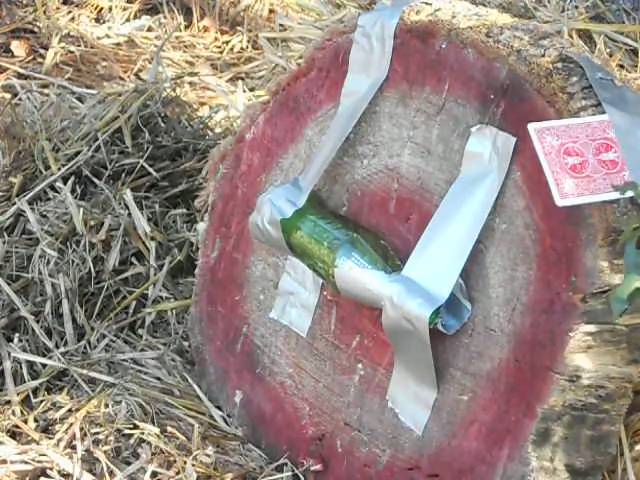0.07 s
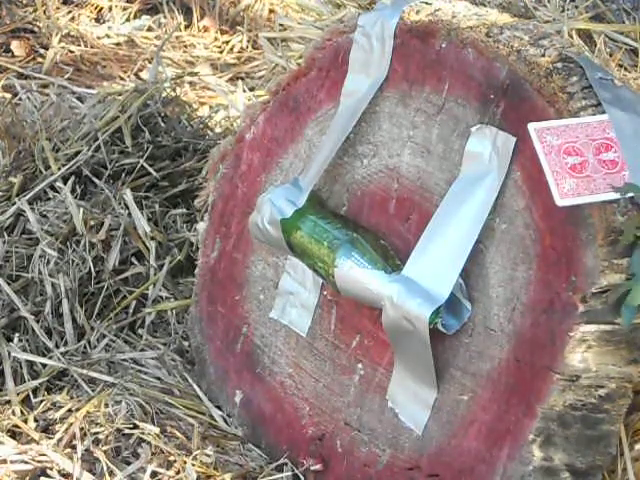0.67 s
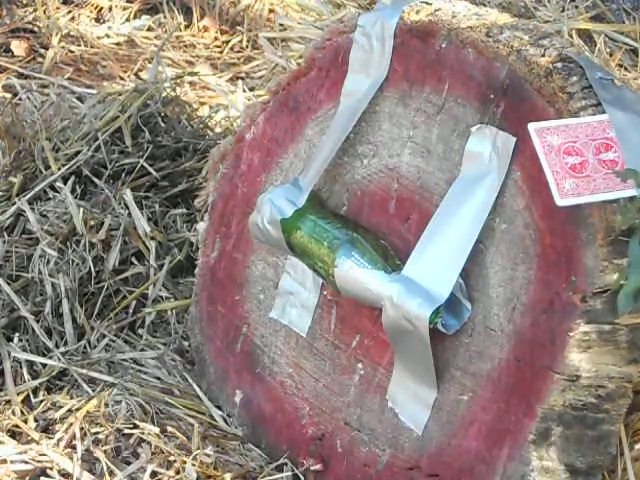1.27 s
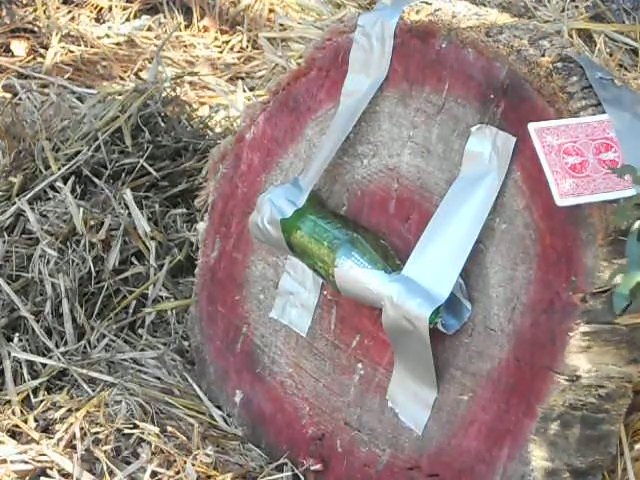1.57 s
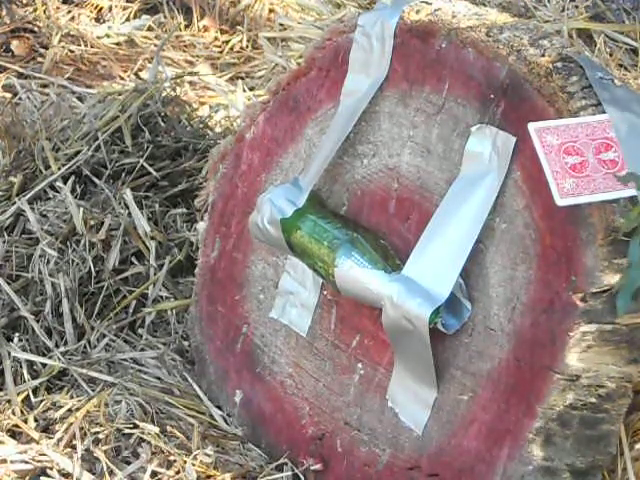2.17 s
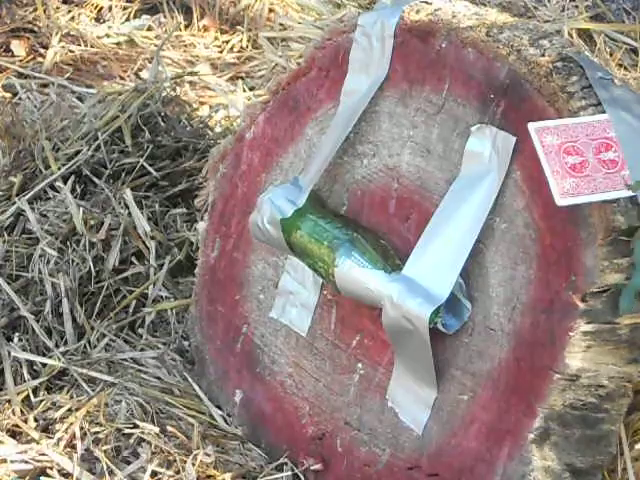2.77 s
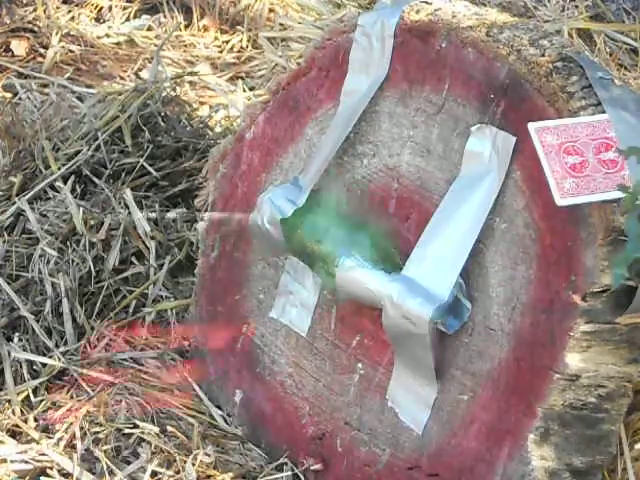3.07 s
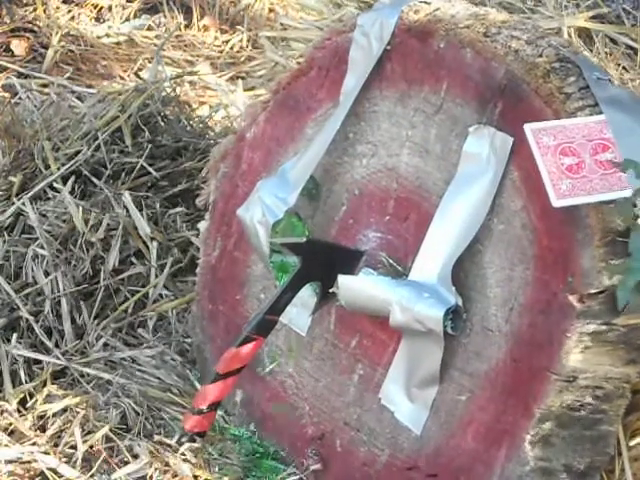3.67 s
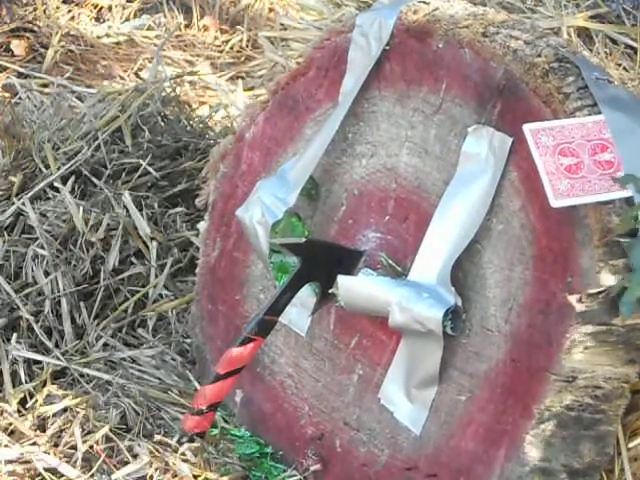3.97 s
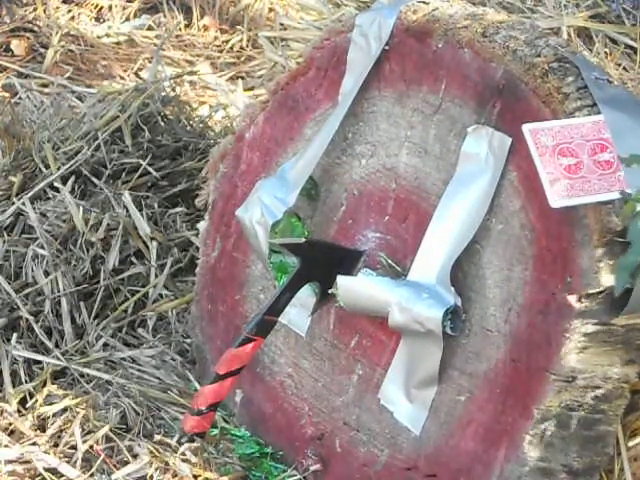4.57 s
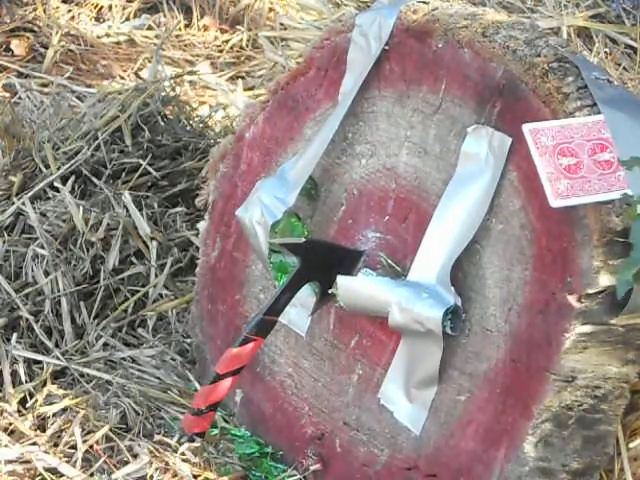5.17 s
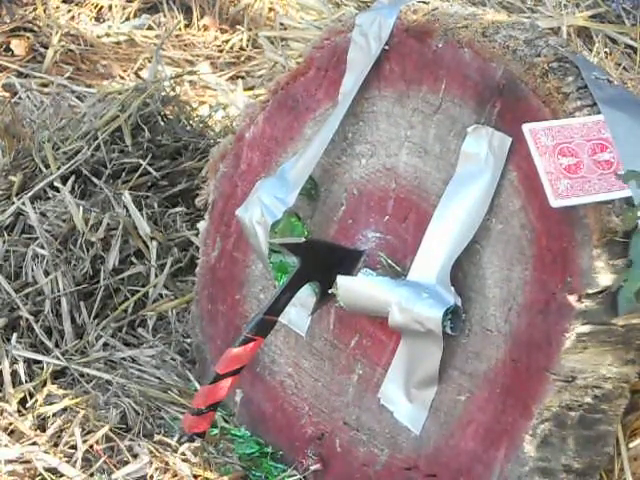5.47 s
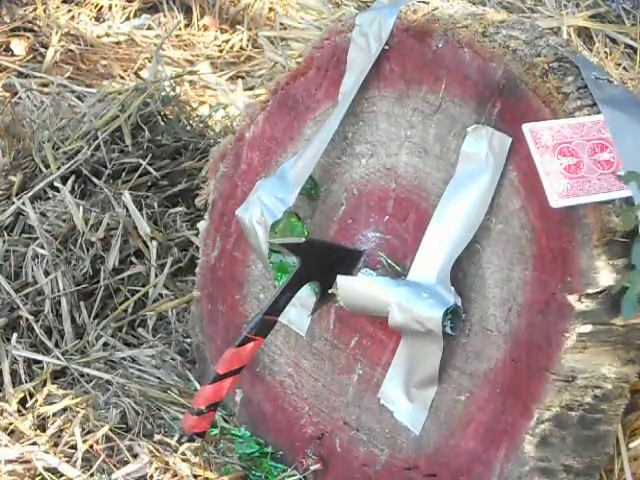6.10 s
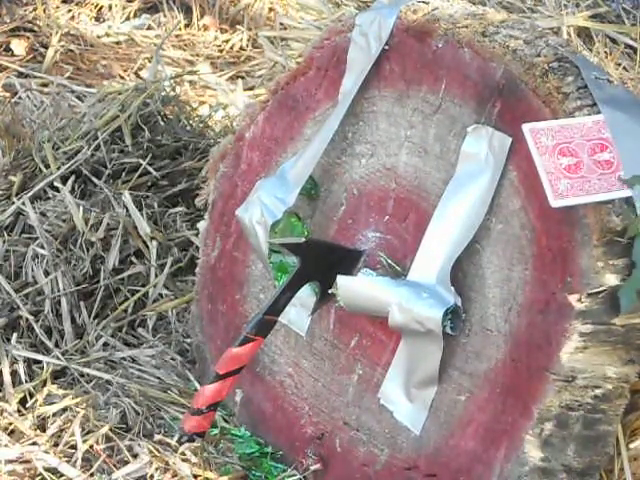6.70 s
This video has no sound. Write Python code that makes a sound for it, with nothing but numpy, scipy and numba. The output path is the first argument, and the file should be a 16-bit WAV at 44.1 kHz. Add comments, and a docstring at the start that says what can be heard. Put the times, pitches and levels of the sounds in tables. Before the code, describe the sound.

A thrown axe swishes in and smashes a glass bottle against a wooden target, shards scattering over a distant traffic hum.

```python
"""Distant traffic hums outdoors; a bird chirps, then a thrown axe swishes in and smashes a glass bottle.
The bottle is taped to a log target, which thuds as the blade bites. For two seconds shards clink
together and drop into straw. The blow makes the nearby camcorder turn its own volume down;
the traffic and an idling engine swell back as it recovers."""
import sys
import numpy as np
from scipy import signal
from scipy.fft import rfft, irfft
from scipy.io import wavfile
from scipy.ndimage import uniform_filter1d, minimum_filter1d
from numba import njit

SR = 44100
rng = np.random.default_rng(int(sys.argv[2]) if len(sys.argv) > 2 else 0)


def store_wav(level_fs):
    """Save 16-bit WAV to argv[1]."""
    pcm = np.round(np.clip(np.atleast_2d(level_fs), -1, 1) * 32767)
    wavfile.write(sys.argv[1], SR, pcm.T.astype(np.int16))


N = 306054
TIME = np.arange(N) / SR
HIT_S = 3.0964


def undb(db):
    """Turn decibels into a factor to multiply by."""
    return 10 ** (np.asarray(db) / 20)


def unit(x):
    """Scale x to an average power of 1."""
    return x / np.sqrt(np.mean(x ** 2) + 1e-20)


def add(out, s, x):
    """Mix x into out, starting at s seconds."""
    i = int(s * SR)
    out[i:i + len(x)] += x[:N - i]


def colour(x, points):
    """Make each frequency louder or softer along a curve of (f/Hz, level/dB) points."""
    hz, db = np.transpose(points)
    f = np.fft.rfftfreq(len(x), 1 / SR)
    curve_db = np.interp(np.log(f + 1), np.log(hz), db)
    return irfft(rfft(x) * undb(curve_db), len(x))


def band(x, lo_hz, hi_hz, order=2):
    """Keep the sound between two frequencies."""
    return signal.sosfilt(signal.butter(order, [lo_hz, hi_hz], "band", fs=SR, output="sos"), x)


def walk(rate):
    """A smooth random wander of size about 1, changing about rate times a second."""
    k = int(SR / rate)
    steps = np.repeat(rng.standard_normal(N // k + 1), k)
    return unit(uniform_filter1d(uniform_filter1d(steps, k), k)[:N])


def tone(hz, waver, rate):
    """A tone whose pitch wanders by about the fraction waver."""
    pitch = hz * (1 + waver * walk(rate))
    return unit(np.sin(2 * np.pi * np.cumsum(pitch) / SR))


def fade(t60, size):
    """Die away by 60 dB every t60 seconds (the fade time)."""
    return np.exp(-np.log(1000) * TIME[:size] / t60)


def ring(notes, size=20000):
    """A struck object sounds all its natural notes at once, and each dies away."""
    return sum(undb(db) * fade(t60, size) * np.sin(2 * np.pi * hz * TIME[:size]) for hz, db, t60 in notes)


def traffic(level_db=-34.3, rise_db_per_s=.14, bass_rise_db_per_s=.15, swell_db=.2, flutter_db=1.2):
    """Distant traffic slowly draws nearer, its restless bass swelling most."""
    # traffic wash and open-air hiss: f/Hz, level/dB
    spectrum = [(12, -30), (20, -1.5), (63, -1), (87, -2), (113, -4.5), (147, -10.5), (186, -11),
                (397, -11.5), (529, -8), (826, -7.5), (1150, -11), (2360, -21), (5170, -26), (10500, -28.5)]
    air = unit(colour(rng.standard_normal(N), spectrum))
    bass = signal.sosfiltfilt(signal.butter(2, 350, fs=SR, output="sos"), air)
    bass_gain = undb(flutter_db * walk(9) + bass_rise_db_per_s * (TIME - TIME.mean()))
    gain = undb(level_db + rise_db_per_s * TIME + swell_db * walk(3))
    return (bass * bass_gain + air - bass) * gain


def engine(firing_hz=75.6, growl_db=-14):
    """A far engine idles and grows louder: its firing hums, with a growl and a drone above."""
    # engine loudness over time: t/s, hum level/dB, drone level/dB
    loudness = [(0, -53, -55), (1.6, -51, -54), (2.15, -44.5, -47), (4.6, -42, -49), (5.25, -38.5, -43.5),
                (5.8, -37, -47), (6.94, -35, -45)]
    s, *levels = np.transpose(loudness)
    hum_db, drone_db = (np.interp(TIME, s, db) for db in levels)
    hum = unit(tone(firing_hz, waver=.024, rate=14) * undb(2 * walk(10)))
    growl = undb(growl_db) * unit(band(rng.standard_normal(N), 310, 430))
    drone = unit(band(rng.standard_normal(N), 134, 144))
    return (hum + growl) * undb(hum_db) + drone * undb(drone_db)


def whine():
    """Two close, nearly steady tones come from inside the camcorder."""
    # the thin whine: f/Hz, level/dB
    tones = [(7852, -64), (7882, -62)]
    return sum(undb(db) * tone(hz, waver=.0005, rate=6) for hz, db in tones)


def bird(start_s=.999, length_s=.052, edge_s=.007, level_db=-43.5,
         low_hz=6750, low_after_s=.023, glide_hz_per_s=32000):
    """A small bird's chirp scoops down to its lowest pitch and rises again."""
    age = np.clip(TIME - start_s, 0, length_s)
    hz = low_hz + glide_hz_per_s * np.abs(age - low_after_s)
    fade_in_out = np.minimum(1, np.minimum(age, length_s - age) / edge_s)
    return tone(hz, waver=.02, rate=500) * undb(level_db) * fade_in_out


def swish():
    """The spinning blade tears the air in gusts that swell and fade."""
    # gusts as the axe nears the target: peak t/s, level/dB, half-length/s
    gusts = [(2.818, -42, .01), (3.03, -41, .028), (3.085, -41, .011)]
    swell = sum(undb(db) * np.exp(-.5 * ((TIME - s) / half) ** 2) for s, db, half in gusts)
    return unit(band(rng.standard_normal(N), 2000, 6800)) * swell


def tick(hz, t60, ring_db=-9, scuff_db=-23, ring_t60=.015, scuff_t60=.06, size=4000):
    """Glass snaps, rings and scuffs; a higher hz means a smaller, brighter piece."""
    # the sound a splinter gives off: f/Hz, level/dB
    spectrum = [(500, -34), (1500, -16), (2800, -14.5), (3700, -9.5), (4600, -0.5), (5300, 0), (6400, -4.5),
                (7500, -5), (9000, -3.5), (10500, -5), (13000, -12)]
    tilt = 16 * np.log2(hz / 6400)  # dB per octave
    tilted = [(f, db + tilt * np.log2(max(f, 3500) / 6400)) for f, db in spectrum]
    noise = unit(colour(rng.standard_normal(size), tilted))
    snap = noise * (fade(t60, size) + undb(scuff_db) * fade(scuff_t60, size))
    # each splinter bends at its own two pitches
    low, high = rng.uniform(4400, 5700), rng.uniform(7400, 9800)
    ringing = ring([(low, ring_db - tilt / 2, ring_t60), (high, ring_db + tilt / 2, ring_t60)], size)
    x = band(snap + ringing, 1200, 14000)
    return x / np.sqrt(np.mean(x[:SR // 200] ** 2))  # power 1 over the first 5 ms


def bottle_burst(ring_db=-1):
    """The bottle rings as cracks run through it; thin glass gives off only treble."""
    # the breaking bottle's notes: f/Hz, level/dB, fade time/s
    notes = [(3650, 2, .037), (4200, 19, 0.013), (4850, 33.5, .012), (5060, 21, .055), (5040, -10.5, 0.36),
             (7380, 25, 0.016), (8260, 20, .012), (9040, 9, .036)]
    # cracks in the glass: t/s, level/dB, brightness/Hz, fade time/s
    cracks = [(3.0976, 17.5, 6200, 0.012), (3.099, 16, 7000, 0.0051), (3.1, 19, 5400, .005)]
    glass = np.zeros(N)
    add(glass, HIT_S, undb(ring_db) * ring(notes))
    for s, db, hz, t60 in cracks:
        add(glass, s, undb(db) * tick(hz, t60, ring_db=-15.5, scuff_db=-29.5))
    return band(glass, 3200, 16000)


def log_thud(bite_delay_s=.0003, size=8000):
    """The blade sets the log ringing, and wood fibres crunch briefly under each knock."""
    # notes of the log and axe head: f/Hz, level/dB, fade time/s
    notes = [(347, 15, 0.034), (560, 17.5, .03), (852, 13, .05), (1124, 31.5, .013), (1130, -10.5, 0.48),
             (1390, 17.5, .012), (1880, 18.5, .014), (2300, 0.5, .07)]
    # dull knocks of handle, log and heavy pieces: t/s, level/dB, centre f/Hz, fade time/s
    knocks = [(3.097, 17, 850, .018), (3.1008, 21, 650, .009), (3.1014, 23, 648, .01),
              (3.1455, -4, 600, 0.045), (4.8673, -27, 1500, 0.014), (6.0632, -18, 570, 0.016)]
    wood = np.zeros(N)
    add(wood, HIT_S + bite_delay_s, ring(notes))
    for s, db, hz, t60 in knocks:
        crunch = unit(band(rng.standard_normal(size), hz / 2, hz * 2, order=3))
        add(wood, s, undb(db) * crunch * fade(t60, size))
    return band(wood, 305, 8000, order=5)  # a short, thick log gives off no bass


def spray(scatter_db=3, kinds=12):
    """Countless tiny grains of glass burst out, bounce off the log and trickle into straw."""
    # showers of fine glass: t/s, level/dB, fall/(dB per s), grains per second
    showers = [(3.098, -1, 450, 5500), (3.11, -14.5, 72, 3000), (3.4, -31, 30, 700), (3.78, -35, 18, 400)]
    hits, out = np.zeros(N), np.zeros(N)
    for s, db, fall, rate in showers:
        signs = rng.choice([-1, 1], N)
        strengths = unit(signs * undb(scatter_db * np.minimum(rng.exponential(size=N), 4)))
        lands = rng.random(N) < rate / SR
        add(hits, s, lands * strengths * np.sqrt(SR / rate) * undb(db - fall * TIME))
    kind = rng.integers(0, kinds, N)  # each hit plays one of a few ticks, dull to bright
    for k, hz in enumerate(np.geomspace(5000, 8000, kinds)):
        grain = tick(hz, .0024, ring_db=-18)
        out += signal.oaconvolve(hits * (kind == k), grain / np.linalg.norm(grain))[:N]
    return out


def uneven_times(start_s, length_s, per_s):
    """Random moments, one in each slot of 1 / per_s seconds."""
    slots = np.arange(256) + rng.random(256)
    return start_s + slots[slots < length_s * per_s] / per_s


def clinks(focus_db_per_octave=36, click_db=-18, jingle_db=-14.5, jingle_hz=9700):
    """Shards collide, click and ring, loudest near the pitch that each contact favours."""
    # a shard's notes: f/Hz, level/dB, fade time/s
    notes = [(5300, 0, 0.054), (5390, -5, 0.045), (5669, -12.5, .06), (7278, -0.5, 0.033),
             (9220, -6.5, .07), (9830, -1, .06)]
    # the loudest knocks between larger shards: t/s, level/dB, favoured f/Hz
    contacts = [(3.124, -6, 9800), (3.229, -9, 9100), (3.253, -12, 5270), (3.2585, -12.5, 7400),
                (3.263, -11, 5200), (3.294, -15, 5400), (3.3445, -14, 10400), (3.413, -9, 7300),
                (3.429, -16, 5360)]
    # small shards jingle together while still in the air
    jingle = [(s, jingle_db, jingle_hz) for s in uneven_times(HIT_S, length_s=.24, per_s=25)]
    out = np.zeros(N)
    for s, db, favoured in contacts + jingle:
        detune = 1 + .005 * rng.standard_normal(len(notes))  # no two pieces are the same size
        struck = [(hz * shift, note_db - focus_db_per_octave * abs(np.log2(hz / favoured)), t60)
                  for (hz, note_db, t60), shift in zip(notes, detune)]
        add(out, s, undb(db) * ring(struck))
        add(out, s, undb(db + click_db) * tick(favoured, .008))
    return out


def splinters():
    """The loudest splinters tick as they land on wood and straw."""
    # splinters landing: t/s, level/dB, brightness/Hz, fade time/s
    landings = [(3.1463, -5, 6000, .012), (3.2027, -12, 5000, .018), (3.4425, -23, 6200, .015),
                (3.4851, -25, 5800, .014), (3.4995, -22, 5800, .012), (3.6663, -27, 5900, .0054),
                (3.7555, -28, 6700, .005), (3.8486, -23, 4900, .024), (3.9092, -26, 5500, .006),
                (3.9218, -15, 7800, .012), (4.0629, -31, 5800, .005), (4.1121, -26, 6400, .016),
                (4.1762, -21, 6400, .016), (4.181, -27, 6400, .05), (4.234, -22, 5700, .0056),
                (4.2698, -30.5, 6000, .014), (4.3329, -21.5, 7000, .008), (4.34, -30, 5600, .006),
                (4.4889, -28.5, 8400, .0056), (4.5557, -35, 5400, .011), (4.574, -32, 7240, .0061),
                (4.8254, -35.5, 5100, .021), (4.868, -26, 6300, .018), (5.1503, -32, 6300, .022)]
    out = np.zeros(N)
    for s, db, hz, t60 in landings:
        add(out, s, undb(db) * tick(hz, t60))
    return out


def patter(per_s=26, scatter_db=2, centre_hz=6500, spread_octaves=.15):
    """Lesser splinters land at random, each with its own brightness and strength."""
    # two waves, pieces flung down and then those flung high: t/s, length/s, level/dB, fall/(dB per s)
    waves = [(3.16, .34, -21, 22), (3.76, .42, -27, 20)]
    out = np.zeros(N)
    for start, length, db, fall in waves:
        chance = rng.standard_normal((256, 2))
        for s, (strength, brightness) in zip(uneven_times(start, length, per_s), chance):
            gain = undb(db - fall * (s - start) + scatter_db * strength)
            add(out, s, gain * tick(centre_hz * 2 ** (spread_octaves * brightness), t60=.009))
    return out


def with_echo(x, echo_db, low_t60=.5, high_t60=.48, treble_db=-5, size=30000):
    """Sound bounces faintly back from the ground, straw and trees."""
    low = band(rng.standard_normal(size), 180, 1500) * fade(low_t60, size)
    high = band(rng.standard_normal(size), 1500, 10000) * fade(high_t60, size)
    tail = (low + undb(treble_db) * high) * (1 - fade(.034, size))
    return x + undb(echo_db) * signal.oaconvolve(x, tail / np.linalg.norm(tail))[:N]


@njit
def recover(wanted, step):
    """The volume drops at once to the wanted value and creeps back up."""
    gain, g = np.empty(len(wanted)), 1.
    for i in range(len(wanted)):
        g = min(wanted[i], g + (wanted[i] - g) * step)
        gain[i] = g
    return gain


def limiter(x, ceiling_db=-12, look_ahead_s=.0036, hold_s=.67, release_s=1.136):
    """The camcorder turns itself down just before a loud peak, waits, then slowly recovers."""
    loudness = np.sqrt(np.abs(uniform_filter1d(x ** 2, SR // 200)) + 1e-12)
    wanted = np.minimum(1, undb(ceiling_db) / loudness)
    half = int(hold_s * SR / 2)
    held = minimum_filter1d(wanted, 2 * half + 1, origin=half, mode="nearest")
    early = np.roll(held, -int(look_ahead_s * SR))
    return x * recover(early, 1 / (release_s * SR))


def scene():
    """The smash and its falling glass, over the sounds of the open air."""
    smash = bottle_burst() + log_thud() + splinters() + clinks() + patter() + spray()
    smash = with_echo(smash, echo_db=-33)
    chirp = with_echo(bird(), echo_db=-10, high_t60=.2)
    return (smash + swish() + chirp + traffic() + engine() + whine())[None]


def record(dry, rumble_db=-64, treble_limit_hz=12100, clip_at=.74, top_hz=16000):
    """The camcorder limits the blow, adds rumble, cuts the highest treble and clips the tallest peaks."""
    # the camcorder's own rumble: f/Hz, level/dB
    rumble_spectrum = [(20, -7.5), (40, -6.5), (54, -6), (65, -5), (77, -4), (100, -15), (135, -15),
                       (170, -29.5), (400, -32), (1500, -46), (10000, -61.5)]
    # how well the microphone hears high treble: f/Hz, level/dB
    microphone = [(9000, 1), (10200, -.7), (11000, -14), (11650, -15.5), (12400, -37.5)]
    rumble = undb(rumble_db) * unit(colour(rng.standard_normal(N), rumble_spectrum))
    x = colour(limiter(dry[0]) + rumble, microphone)
    x = signal.sosfilt(signal.ellip(8, .2, 70, treble_limit_hz, fs=SR, output="sos"), x)
    x = np.clip(x, -clip_at, clip_at)
    return signal.sosfilt(signal.ellip(8, .2, 70, top_hz, fs=SR, output="sos"), x)[None]


dry = scene()
out = record(dry)
store_wav(out)
```